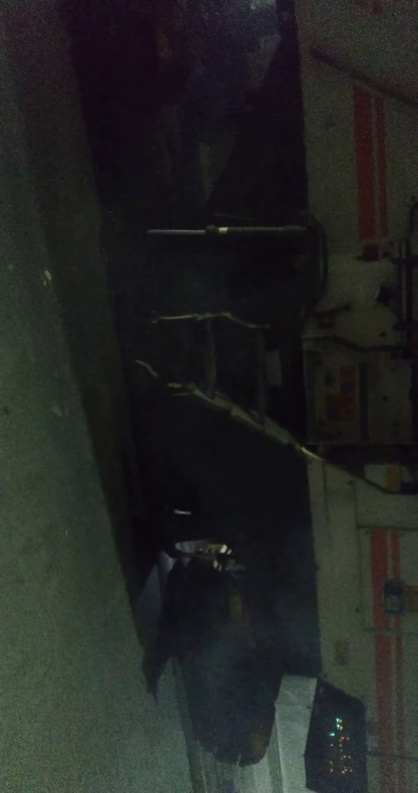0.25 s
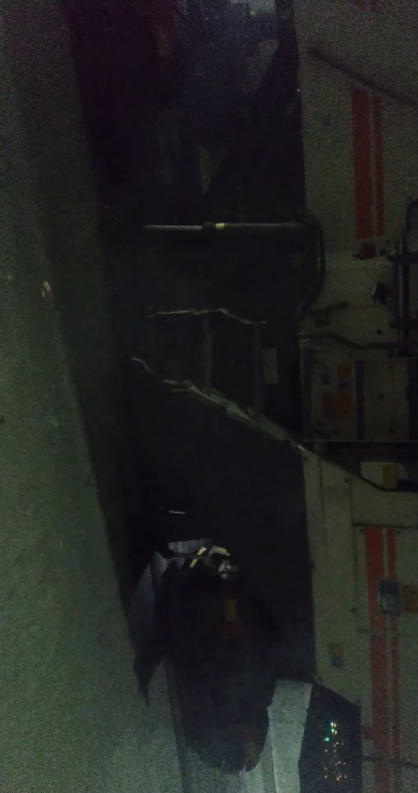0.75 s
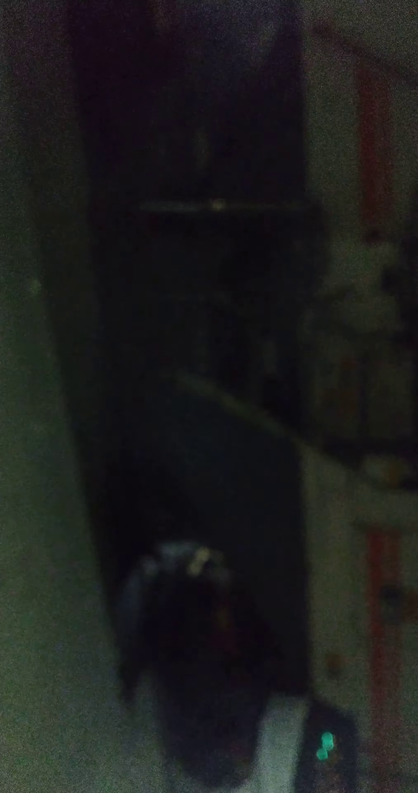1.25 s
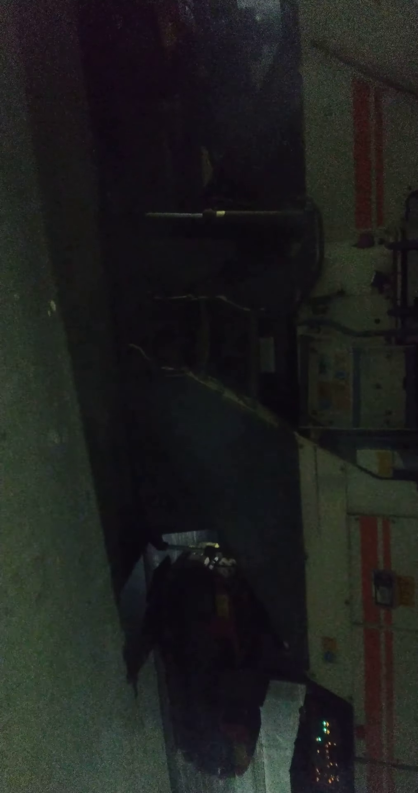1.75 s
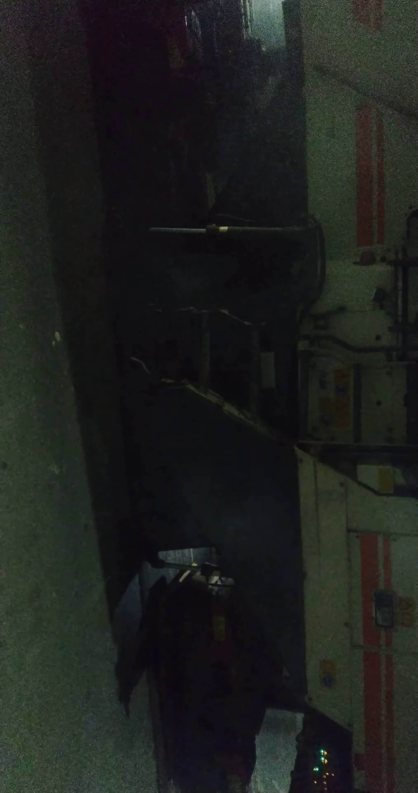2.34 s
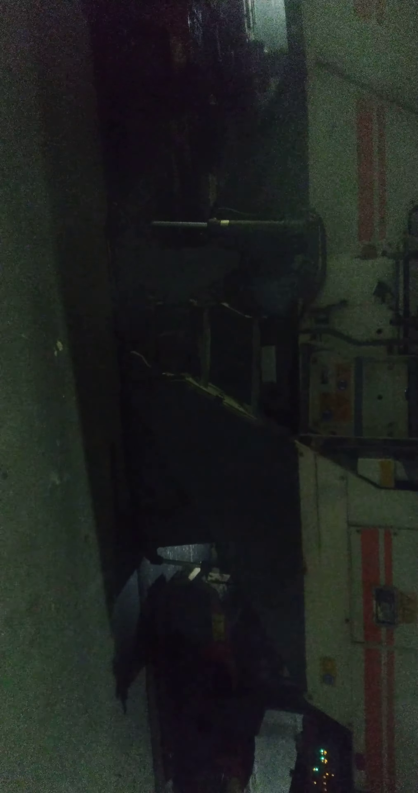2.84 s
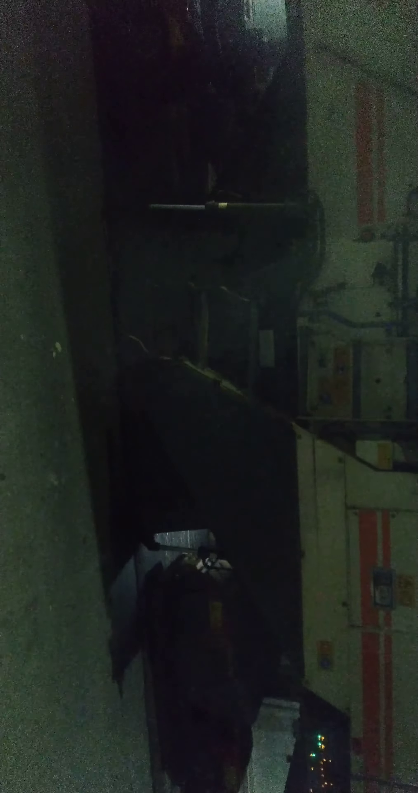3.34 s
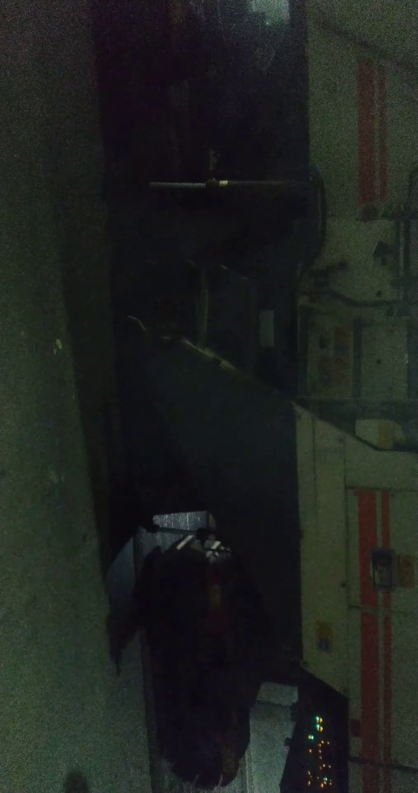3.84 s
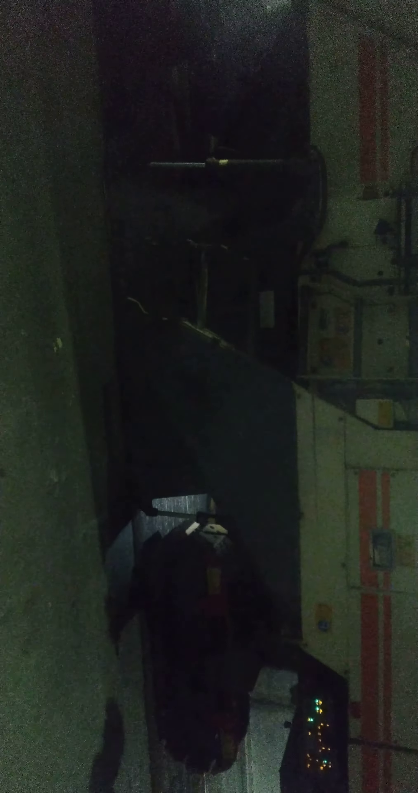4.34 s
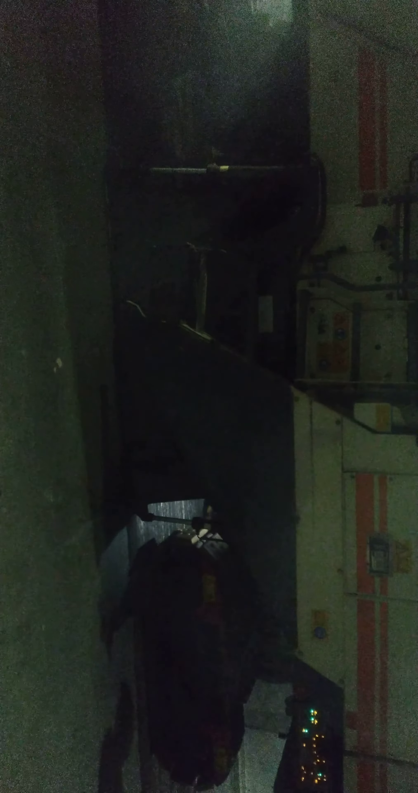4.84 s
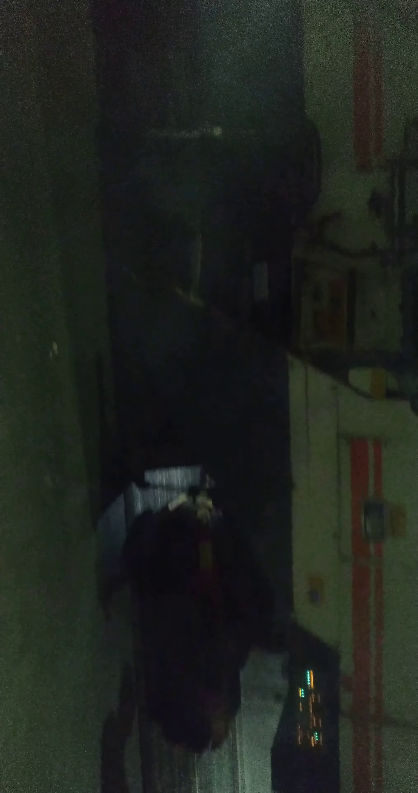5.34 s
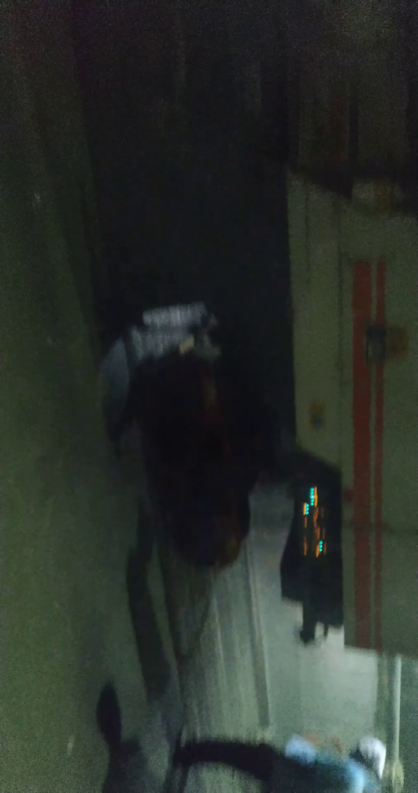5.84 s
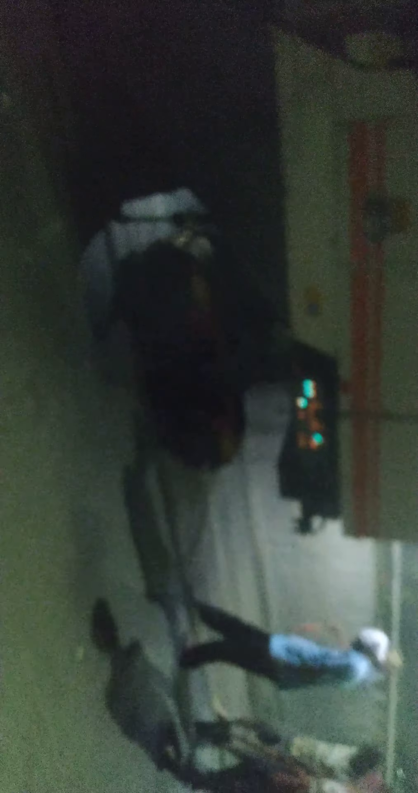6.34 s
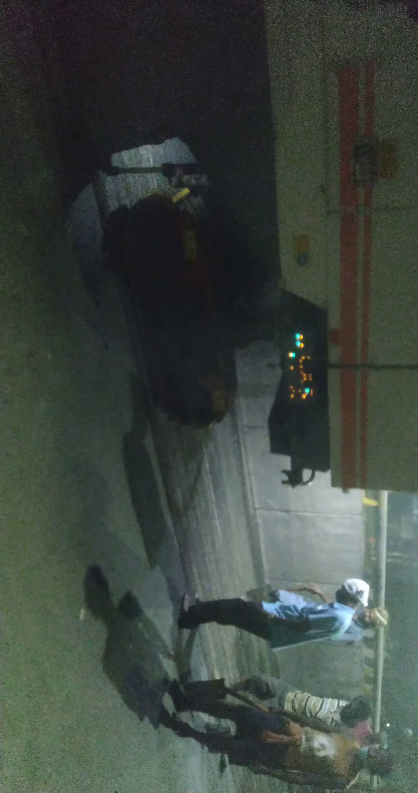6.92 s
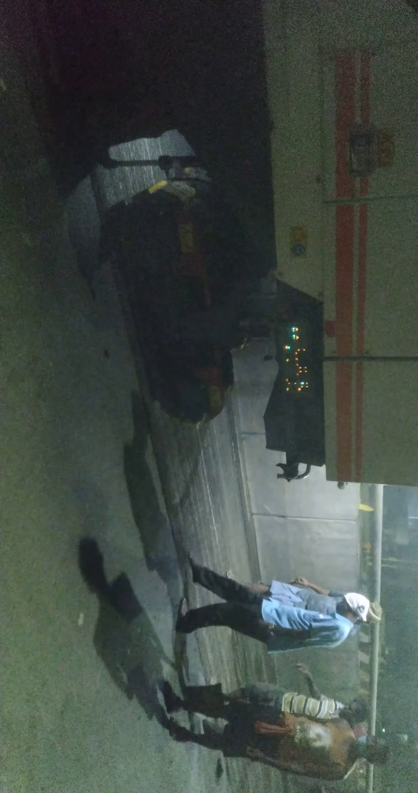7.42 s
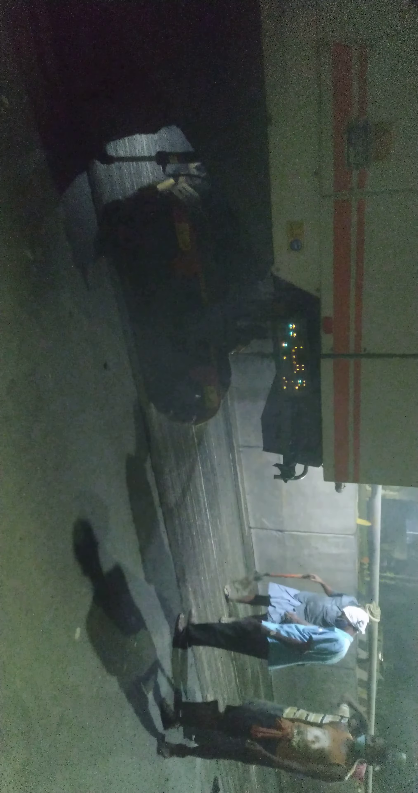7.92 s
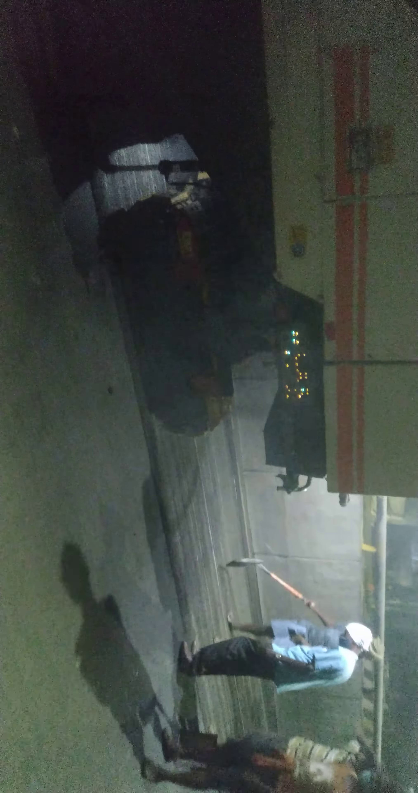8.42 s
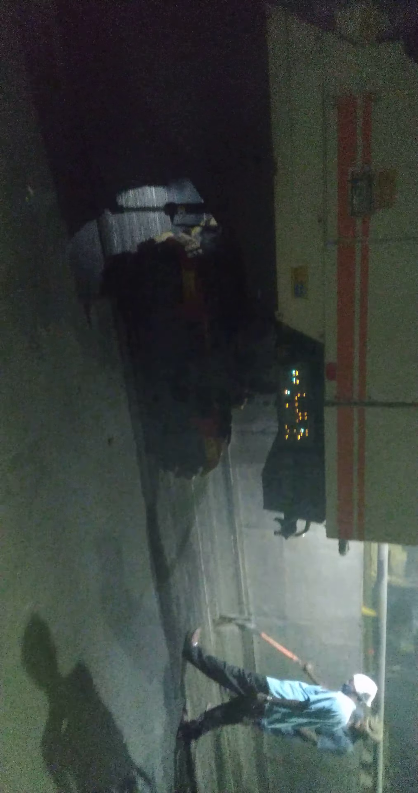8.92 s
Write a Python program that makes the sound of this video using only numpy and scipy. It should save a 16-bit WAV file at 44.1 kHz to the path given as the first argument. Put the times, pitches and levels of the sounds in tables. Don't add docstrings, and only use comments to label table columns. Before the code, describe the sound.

Continuous diesel drone at a night roadwork site, heard close on a handheld stereo microphone. A low, firm engine hum dominates from start to finish, with dull rumbling roar and gritty fan and injector noise above. Medium and high whines waver beneath it, shifting in strength and side. Brief, faint high squeaks come irregularly. After the midpoint the upper roar opens and the deepest hum eases a little.

```python
import sys
import numpy as np
from scipy import signal
from scipy.io import wavfile
from scipy.ndimage import uniform_filter1d

SR = 44100
rng = np.random.default_rng(int(sys.argv[2]) if len(sys.argv) > 2 else 0)


def boost_factor(decibels):
    exponent = np.asarray(decibels, float) / 20
    return 10 ** exponent


def log_audio(samples):
    frames = np.atleast_2d(samples).T
    limited = np.clip(frames, -1, 1)
    pcm = np.round(limited * 32767).astype(np.int16)
    wavfile.write(sys.argv[1], SR, pcm)


N = 403956
TIME = np.arange(N) / SR
CONTROL = 64

# time in seconds, firings per second in Hz.
ENGINE_SPEED = [(0, 103.5), (.75, 103.48), (1.05, 103.85), (1.5, 103.7), (2.4, 103.9), (3.5, 103.85),
                (4.2, 104.0), (5.1, 103.7), (5.5, 103.4), (6.3, 103.33), (7.2, 103.23), (8, 103.45),
                (8.7, 103.58), (9.16, 103.64)]
# time in seconds, turn towards the rear from 0 to 1,
# lag of the second firing multiple in rad, nearness in dB.
HAND = [(0, 0.19, 1.7, 0.5), (.6, 0, 1.72, -0.5), (2, .06, 1.77, 0), (3, .17, 1.8, 0.3),
        (4.5, 0.3, 1.98, -0.5), (5.5, 0.39, 2.1, 0.3), (6.5, 0.81, 2.5, -0.5), (7.5, 1, 2.9, 0),
        (8.5, .85, 3.3, 1.1), (9.16, 1, 3.6, 2)]
STANCE_TIMES = [1.5, 4.5, 7.5]

# multiple of the engine cycle, level in dB at each stance.
UNEVEN_ORDERS = [(7, -54, -45, -41), (8, -42, -39, -39), (9, -35, -31, -29), (10, -42, -39, -37),
                 (11, -55, -44, -45), (13, -49, -49, -47), (14, -39, -37, -35), (15, -43, -49, -38),
                 (16, -41, -39, -32), (17, -46, -48, -43), (19, -54, -53, -44), (20, -50, -43, -45),
                 (21, -46, -47, -46), (22, -50, -50, -45), (24, -48, -54, -51), (25, -48, -48, -53),
                 (36, -55, -55, -44), (37, -48, -46, -55), (40, -56, -52, -49)]
FIRING_DB, FIRING_TURN_DB = -13.0, -3
EXHAUST_PAN_DB, EXHAUST_PAN_TURN_DB = .55, -.7
THIRD_LAG, THIRD_LAG_SHARE = 3.1, .45

# frequency in Hz, density in dB per Hz.
RUMBLE_SPECTRUM = [(20, -93), (30, -77.5), (40, -58.5), (52, -55), (65, -56), (77, -49.5), (90, -61),
                   (125, -54.5), (200, -55), (300, -56.5), (420, -59.5), (560, -63), (900, -81.5),
                   (1400, -114.5)]
RUMBLE_DB, RUMBLE_TURN_DB = -2, 1.0
RUMBLE_SLOPE_DB, RUMBLE_SLOPE_TURN_DB = -1.0, 2

# frequency in Hz, density in dB per Hz.
CLATTER_SPECTRUM = [(300, -70), (560, -66.5), (800, -57.5), (1100, -62), (1900, -63), (2600, -68.5),
                    (3000, -75.5), (4500, -76), (5800, -82.5), (6800, -92.5), (8000, -100), (9800, -92),
                    (13800, -80.5), (15700, -86)]
CYLINDER_KNOCKS = [0.45, 2.1, 0.49, 0.99, 0.62, 0.27]
CLATTER_DB, CLATTER_SLOPE_DB, CLATTER_SLOPE_TURN_DB = -2, -1.6, 1.64
TREBLE_PAN_DB, TREBLE_PAN_TURN_DB = -0.7, -1
SHADE_HZ, NEAR_TREBLE = 5000, 0.37

# frequency in Hz, left-right likeness from -1 to 1.
PORT_LIKENESS = [(60, 0.94), (92, 1), (140, 0.82), (210, 0.94), (330, 0.76), (500, 0.71), (770, 0.68),
                 (1170, -0.29), (1790, 0.083), (2740, -0.21), (4190, -0.031), (6410, -0.064),
                 (9810, -0.017), (15000, 0.0)]
# frequency in Hz, left-right difference in dB.
PORT_TILT = [(60, .2), (400, -.4), (700, .8), (1300, -1.3), (2400, .2), (4400, 1), (7000, -1), (9000, 1),
             (11000, 5), (13700, 11), (15500, 9)]

PUMP_ORDER, GEAR_TURNS_HZ = 4.595, 7.2
MESH_HZ, MESH_AT_HZ, MESH_GEARING = 1886, 103.6, 27
MESH_PAN_DB, MESH_PAN_TURN_DB = -3, 13
# frequency in Hz, width in Hz, left-right difference in dB,
# sag as a ratio to the engine's.
GEAR_LINES = [
    (605, 3, 3, 1),
    (1812, 40, -4, 1),
    (2381, 20, 3, 1),
    (3136, 22, -4, 1.3),
]
# frequency in Hz, width in Hz, left-right difference in dB,
# level in dB at each stance.
DRIVE_WHINES = [(1268, 30, -2, -52, -48, -46), (2866, 10, 0, -65, -62, -66), (3589, 14, 0, -68, -65, -60),
                (3790, 24, 1, -68, -68, -64)]

# start in seconds, length in seconds, frequency in Hz, level in dB,
# left-right difference in dB.
SQUEAKS = [(.49, .08, 8360, -69, -14), (.58, .08, 8250, -69, -14), (1.44, .1, 8140, -70, -6),
           (1.79, 0.11, 5870, -58, -1), (1.84, .15, 13707, -62, 0), (2.2, .07, 14480, -56, 4),
           (4.13, .04, 5950, -56, -3), (4.21, .05, 5845, -56, -3), (4.62, .08, 8180, -68, -4),
           (4.67, .05, 5530, -57, -4), (4.75, .08, 5550, -55.5, -4), (4.867, .05, 5530, -55, -3),
           (6.128, 0.2, 7437, -60, -12), (6.18, .07, 14874, -63, 0), (7.8, .1, 7450, -64, -3),
           (8.48, .12, 5600, -57, -2)]

BED_DB = -66.5
# centre in seconds, half width in seconds, top level in dB.
SECOND_LOBES = [(0, .25, -24.5), (3.9, 2.87, -23.5), (7, 2.3, -20)]
THIRD_LOBES = [(.6, 1.9, -35.5), (3.7, 1.1, -37), (5.3, .8, -32.5), (7.9, 1.5, -29)]
PUMP_LOBES = [(.95, .4, -43.5), (3.7, 0.43, -43), (5.7, .9, -35.5), (7.3, 0.88, -38), (8.7, .4, -38)]
OCTAVE_LOBES = [(1.9, 0.97, -42), (4.55, .6, -38.5), (6, .8, -43), (7.45, 0.76, -36)]
MESH_LOBES = [(.2, 1.1, -37.5), (1.9, .9, -38), (3.3, .6, -41.5), (4.7, 1, -38.5), (6.1, 0.55, -46.5),
              (7.3, 1.4, -41.5), (9.1, .3, -45.5)]
TIMING_LOBES = [(0.05, .7, -42), (3.3, 1.9, -42), (6.55, 0.25, -40.5), (7.4, 0.55, -46), (9, .3, -55)]
SECOND_MESH_LOBES = [(3.1, 0.26, -53.5), (6.2, 1, -46), (7.3, .7, -46.5), (9.1, 0.55, -55)]
UPPER_PUMP_LOBES = [(0.05, .3, -52), (1.4, .4, -61.5), (3.5, 0.27, -54), (6.0, .35, -48), (7.1, 0.55, -50),
                    (8.4, .25, -49), (9, .35, -46)]
BELT_LOBES = [(1.3, .4, -62), (3.55, 0.19, -57), (4.25, 0.51, -56), (5.7, .3, -58), (7, 0.85, -55.5),
              (8.4, 0.52, -54.5)]
GEAR_LOBES = TIMING_LOBES, SECOND_MESH_LOBES, UPPER_PUMP_LOBES, BELT_LOBES


def evened(x):
    return x / np.sqrt(np.mean(abs(x) ** 2) + 1e-20)


def read(points, hz):
    f, value = np.transpose(points)
    return np.interp(np.log(hz + 1), np.log(f + 1), value)


def curves(rows, t=TIME):
    s, *columns = np.transpose(rows)
    return [np.interp(t, s, c) for c in columns]


def at_stances(values):
    return np.interp(TIME, STANCE_TIMES, values)


def lobes(rows):
    t = np.linspace(0, TIME[-1], num=500)
    power = sum(boost_factor(db - 6 * ((t - s) / half) ** 2) ** 2 for s, half, db in rows)
    return np.interp(TIME, t, 10 * np.log10(power + boost_factor(BED_DB) ** 2))


def panned(x, pan_db):
    return np.array([x * boost_factor(pan_db / 2), x * boost_factor(-pan_db / 2)])


def wander(hz, count=1):
    a, b = rng.standard_normal((N // CONTROL + 2, count, 2)).T
    r = np.exp(-np.pi * hz * CONTROL / SR)
    return evened(signal.lfilter([1], [1, -2 * r, r * r], a + 1j * b))


def tone(turns, db, width_hz, rough, pan_db, lead=0):
    shared, *own = wander(width_hz, count=3)
    ports = np.sqrt(1 - rough ** 2) + rough * (.85 * shared + .5 * np.array(own))
    left, right = np.repeat(ports, CONTROL, axis=1)[:, :N]
    line = np.sqrt(2) * boost_factor(db) * np.exp(2j * np.pi * (turns + rng.random()))
    left_wave = (left * line * np.exp(1j * lead)).real
    right_wave = (right * line).real
    return np.array([left_wave * boost_factor(pan_db / 2), right_wave * boost_factor(-pan_db / 2)])


def noise(spectrum, level_db, pan_db, patchy_db, size):
    frames = N * 4 // size + 5
    hz = np.fft.rfftfreq(size, 1 / SR)[:, None]
    t = np.arange(frames) * size / 4 / SR
    a, b, c, d, patches = rng.standard_normal((frames, len(hz), 5)).T
    patches = uniform_filter1d(patches, size=12, axis=0)
    patches = evened(uniform_filter1d(patches, size=12, axis=1))
    same = np.clip(read(PORT_LIKENESS, hz), -1, 1)
    left = a + 1j * b
    right = same * left + np.sqrt(1 - same ** 2) * (c + 1j * d)
    tilt = boost_factor((read(PORT_TILT, hz) + pan_db(t, hz)) / 2)
    z = np.array([left * tilt, right / tilt])
    z *= boost_factor(read(spectrum, hz) + level_db(t, hz) + patchy_db * patches)
    waves = signal.istft(z, nperseg=size, noverlap=size * 3 // 4)[1][:, :N]
    return np.sqrt(SR * 3 / size) * waves


def exhaust(firings):
    turn, lag, _ = curves(HAND)
    lags = 0, lag, THIRD_LAG + THIRD_LAG_SHARE * lag
    levels = FIRING_DB + FIRING_TURN_DB * turn, lobes(SECOND_LOBES), lobes(THIRD_LOBES)
    out = np.zeros(N)
    for multiple, (db, late) in enumerate(zip(levels, lags), start=1):
        out += np.sqrt(2) * boost_factor(db) * np.cos(multiple * 2 * np.pi * firings - late)
    for order, *db in UNEVEN_ORDERS:
        phase = 2 * np.pi * (order * firings / 6 + rng.random()) - (order / 6 - 1) * lag
        out += np.sqrt(2) * boost_factor(at_stances(db)) * np.cos(phase)
    return panned(out, EXHAUST_PAN_DB + EXHAUST_PAN_TURN_DB * turn)


def rumble():
    def level_db(t, hz):
        turn = curves(HAND, t)[0]
        db = RUMBLE_DB + RUMBLE_TURN_DB * turn
        slope = RUMBLE_SLOPE_DB + RUMBLE_SLOPE_TURN_DB * turn
        return db + slope * np.log2(np.clip(hz, 220, 500) / 220)
    return noise(RUMBLE_SPECTRUM, level_db, lambda t, hz: 0, patchy_db=2.5, size=4096)


def clatter(firings, depth=0.23, sharp=3.4):
    def level_db(t, hz):
        turn, _, near_db = curves(HAND, t)
        db = CLATTER_DB + near_db * np.interp(hz, [SHADE_HZ, 2 * SHADE_HZ], [1, NEAR_TREBLE])
        db = db + CLATTER_SLOPE_TURN_DB * turn * np.log2(np.clip(hz, 1000, SHADE_HZ) / 1000)
        return db + CLATTER_SLOPE_DB * np.log2(np.maximum(hz, 1000) / 1000)

    def pan_db(t, hz):
        shade_db = TREBLE_PAN_DB + TREBLE_PAN_TURN_DB * curves(HAND, t)[0]
        return shade_db * np.clip(hz / 5000 - 1, 0, 1)

    strength = np.take(CYLINDER_KNOCKS, firings.astype(int) % 6)
    knock = strength * np.exp(-sharp * (firings % 1))
    swell = evened(1 + depth * uniform_filter1d(knock, size=40))
    return swell * noise(CLATTER_SPECTRUM, level_db, pan_db, patchy_db=0.49, size=1024)


def pump(firings):
    lead = at_stances([-.2, .2, -1.1])
    out = tone(PUMP_ORDER * firings, lobes(PUMP_LOBES), 4, .25, 0, lead)
    out += tone(2 * PUMP_ORDER * firings, lobes(OCTAVE_LOBES) + 1.5, 12, .35, -1, lead)
    return out, lead


def gear_mesh(lead):
    facing = curves(HAND)[0]
    mesh_hz = MESH_HZ + MESH_GEARING * (curves(ENGINE_SPEED)[0] - MESH_AT_HZ)
    drift = np.interp(TIME * SR / CONTROL, np.arange(N // CONTROL + 2), wander(.8)[0].real)
    turn = 2 * np.pi * GEAR_TURNS_HZ * TIME + 2.0 * drift
    throb = evened(1 + .22 * np.cos(turn) + .24 * np.cos(2 * turn))
    mesh = np.cumsum(mesh_hz) / SR + .18 * np.sin(turn)
    pan_db = MESH_PAN_DB + MESH_PAN_TURN_DB * facing ** 2
    return throb * tone(mesh, lobes(MESH_LOBES) + 1, 45, .45, pan_db, -lead)


def whines(firings):
    out, lead = pump(firings)
    out += gear_mesh(lead)
    seconds = firings / (firings[-1] / TIME[-1])
    for (hz, width_hz, pan_db, sag), rows in zip(GEAR_LINES, GEAR_LOBES):
        turns = hz * (TIME + sag * (seconds - TIME))
        out += tone(turns, lobes(rows) + 2.2, width_hz, .4, pan_db, .5)
    for hz, width_hz, pan_db, *db in DRIVE_WHINES:
        out += tone(hz * seconds, at_stances(db), width_hz, .65, pan_db, .9)
    return out


def squeaks():
    out = np.zeros((2, N))
    for s, length, hz, db, pan_db in SQUEAKS:
        t = np.arange(round(length * SR)) / SR
        flutter = 1 + 0.27 * np.sin(2 * np.pi * (17 * t + rng.random()))
        envelope = flutter * signal.windows.tukey(len(t), .5)
        whistle = np.sqrt(2) * boost_factor(db) * envelope * np.sin(2 * np.pi * hz * t)
        out[:, round(s * SR):][:, :len(t)] += panned(whistle, pan_db)
    return out


def scene():
    firings = np.cumsum(curves(ENGINE_SPEED)[0]) / SR
    return exhaust(firings) + rumble() + clatter(firings) + whines(firings) + squeaks()


def roll_off(x):
    return signal.sosfilt(signal.butter(12, 15780, fs=SR, output="sos"), x)


def record(dry):
    bass_cut = signal.butter(2, 32, "high", fs=SR, output="sos")
    heard = signal.sosfiltfilt(bass_cut, dry, padtype="even", padlen=4000)
    return roll_off(heard * boost_factor(.2))


dry = scene()
out = record(dry)
log_audio(out)
```